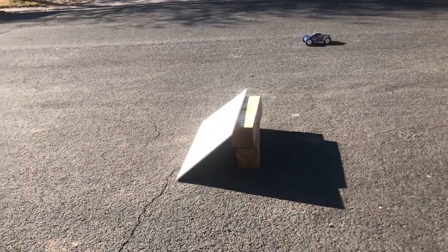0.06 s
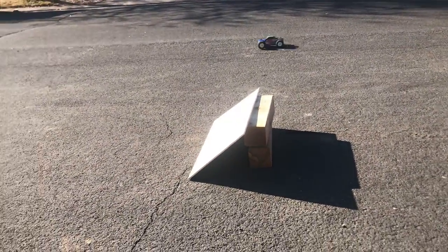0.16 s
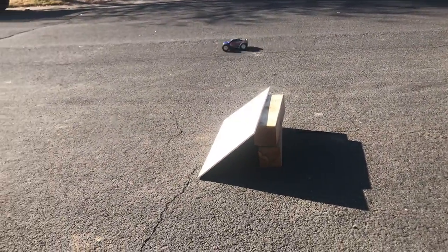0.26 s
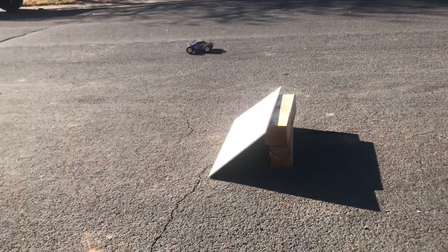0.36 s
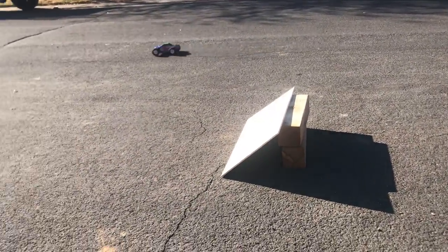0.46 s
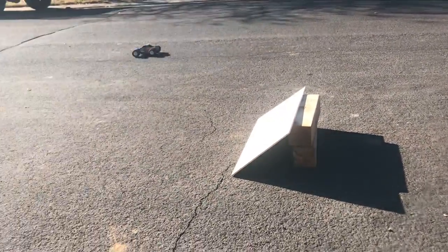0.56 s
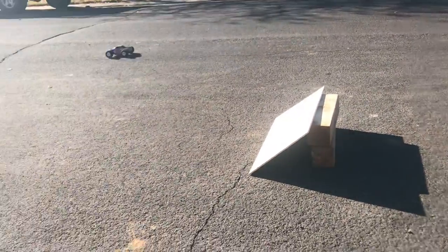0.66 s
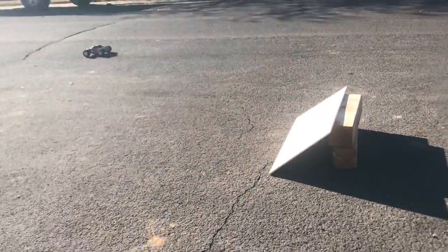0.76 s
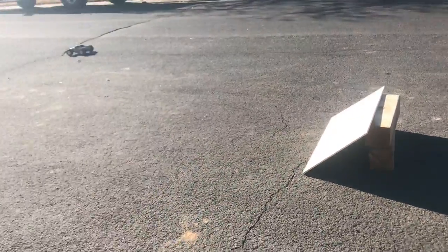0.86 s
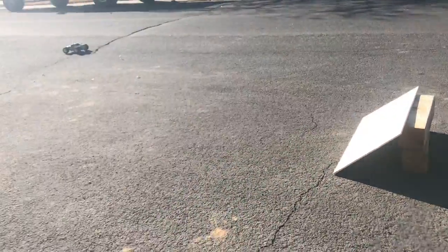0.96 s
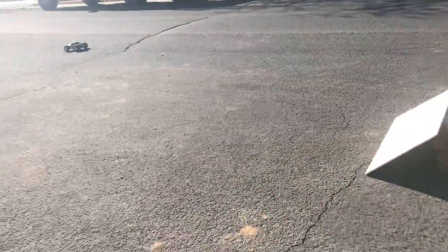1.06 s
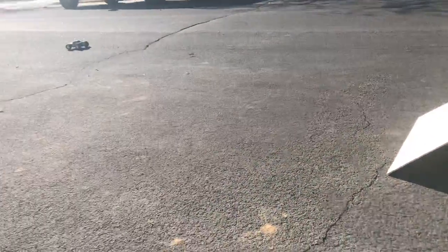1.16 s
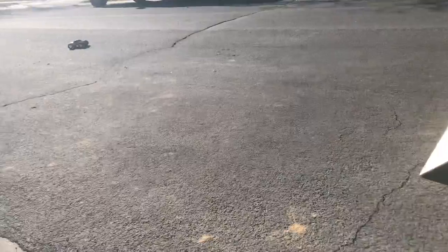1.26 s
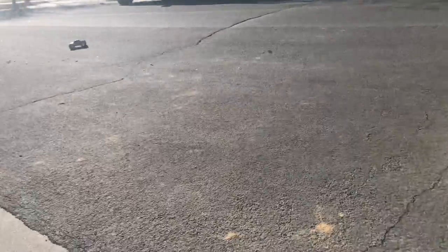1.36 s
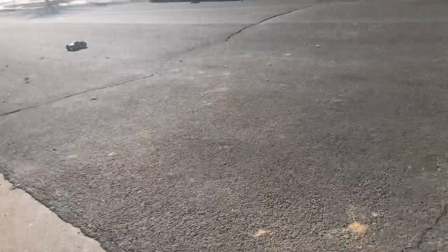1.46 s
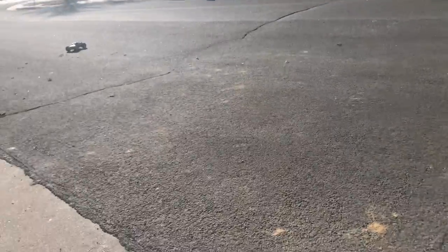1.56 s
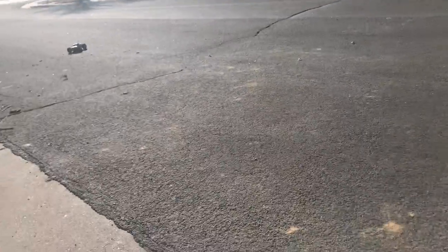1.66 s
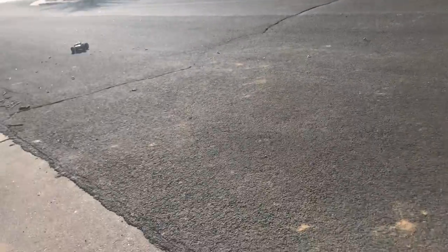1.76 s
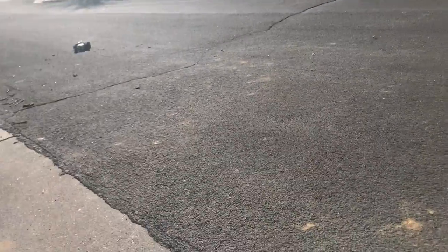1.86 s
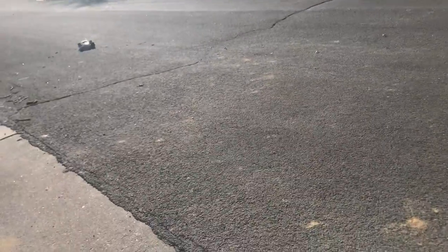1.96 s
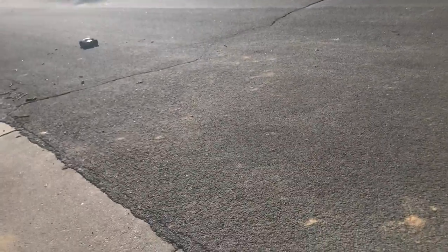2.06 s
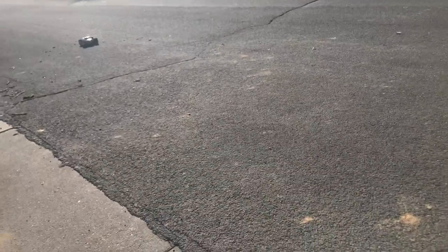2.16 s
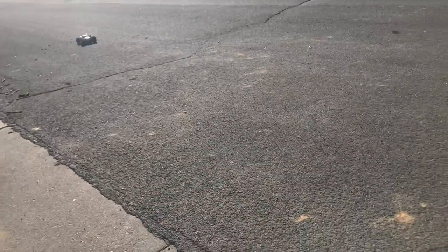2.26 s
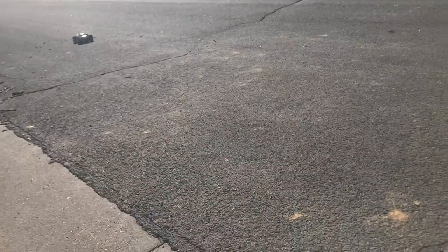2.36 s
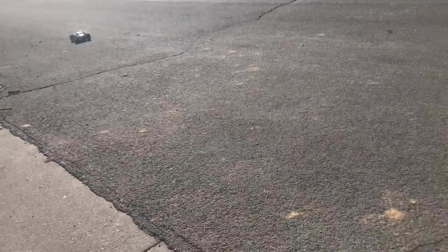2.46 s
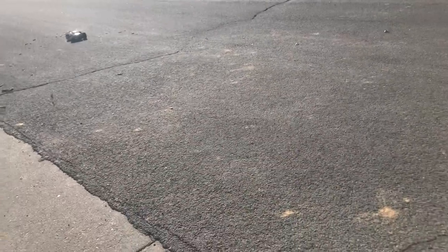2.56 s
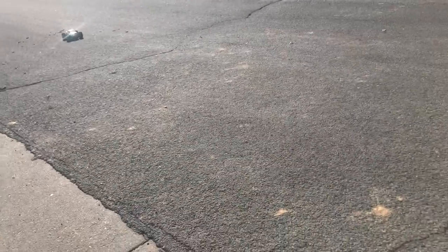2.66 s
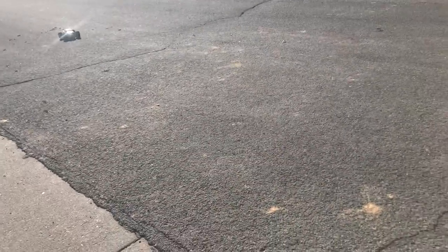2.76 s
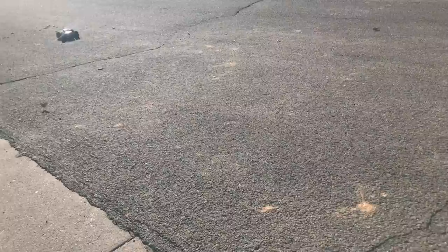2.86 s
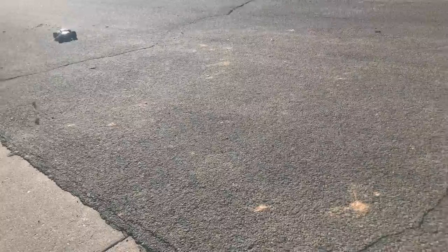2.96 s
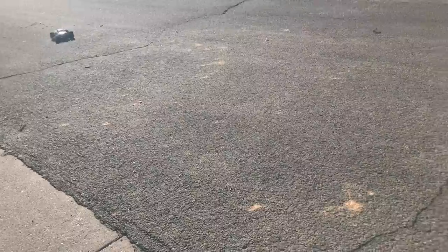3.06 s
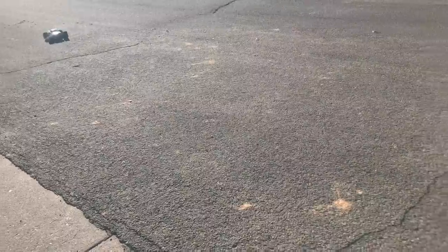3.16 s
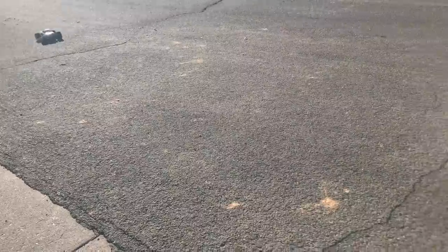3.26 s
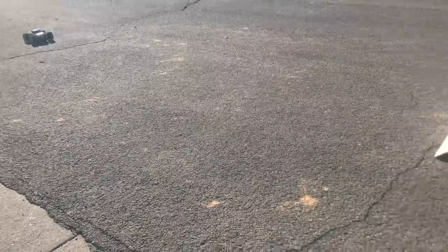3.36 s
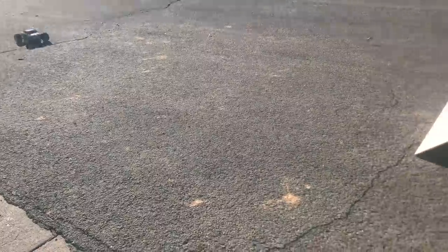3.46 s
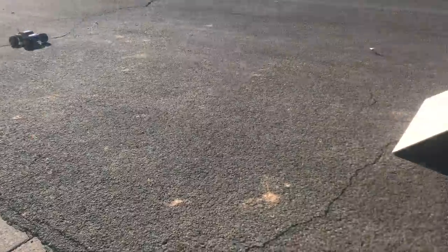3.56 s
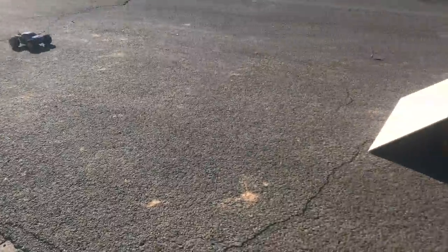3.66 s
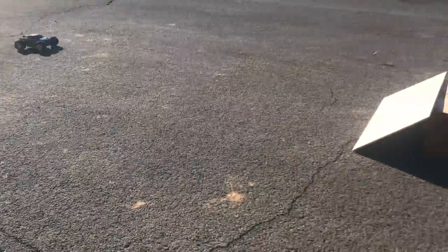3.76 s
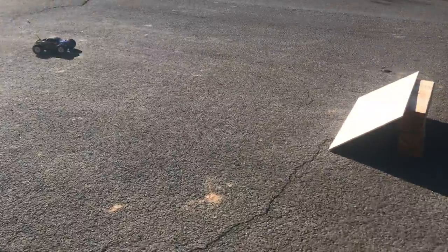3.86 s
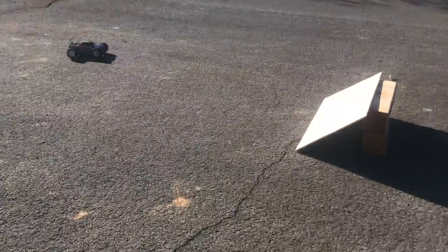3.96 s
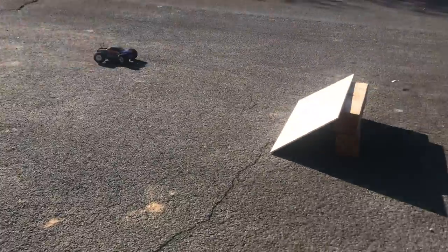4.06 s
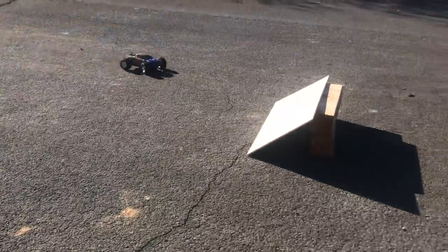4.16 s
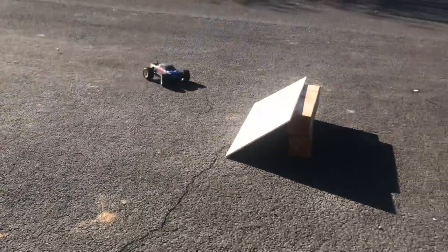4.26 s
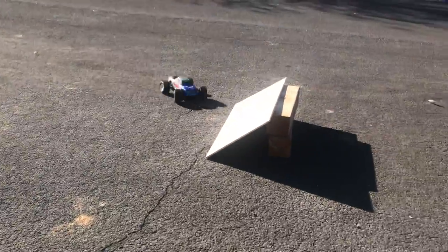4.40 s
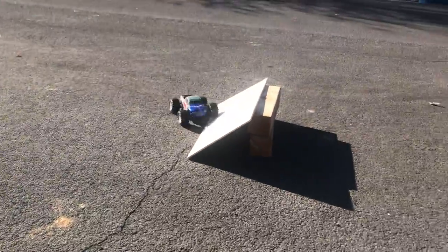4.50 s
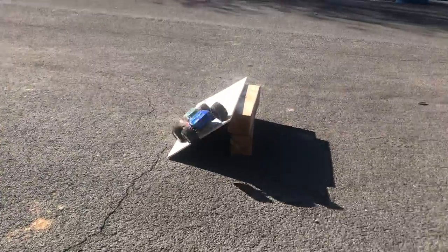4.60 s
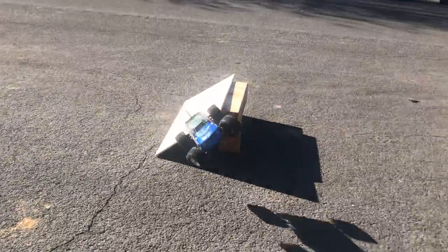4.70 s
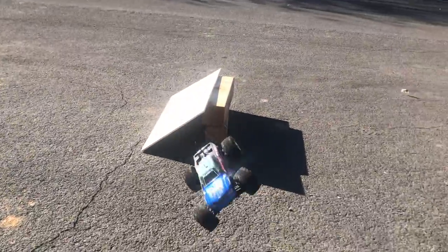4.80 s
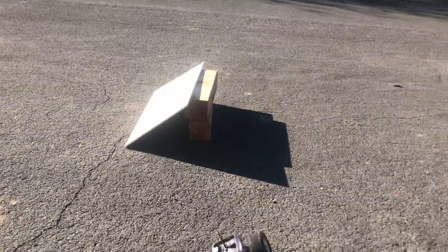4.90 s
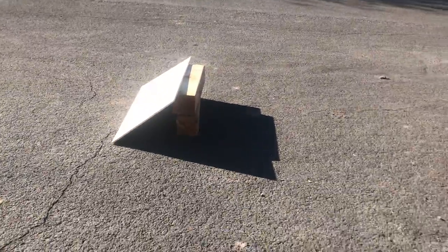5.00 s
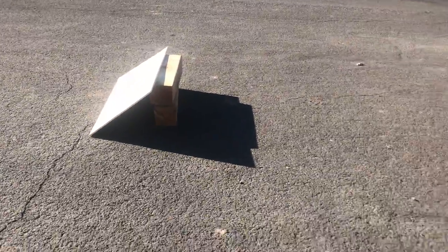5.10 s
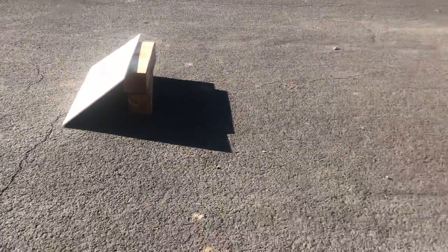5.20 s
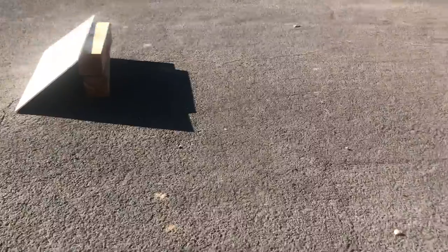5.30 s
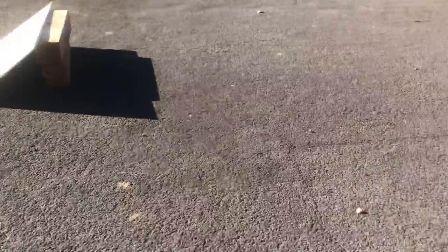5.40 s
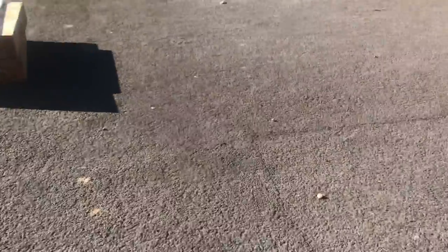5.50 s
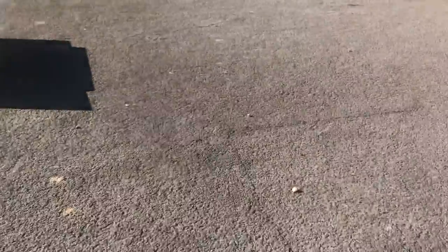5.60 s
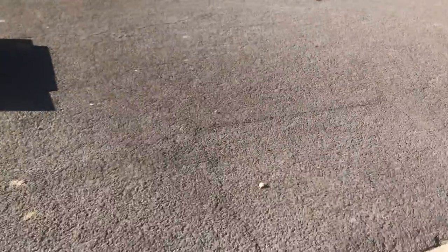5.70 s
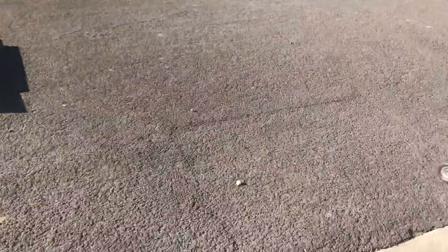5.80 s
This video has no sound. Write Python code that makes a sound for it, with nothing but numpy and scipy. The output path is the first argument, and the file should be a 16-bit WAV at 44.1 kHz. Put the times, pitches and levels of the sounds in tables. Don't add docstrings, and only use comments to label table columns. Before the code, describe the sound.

A toy truck's raspy gear whine rises and breaks into distant rattling bursts, with light tyre hum and a faint chirp. A tiny hard snap comes before a second, longer whine that sweeps up and gets louder and brighter, with wind buffeting the open-air microphone. A bright hard knock on a wooden ramp, loose gear clatter, a landing knock, diminishing rattles, two quick bird chirps, then a short rising whine.

```python
import sys
import numpy as np
from scipy import signal
from scipy.fft import rfft, irfft
from scipy.io import wavfile
from scipy.ndimage import uniform_filter1d

SR = 44100
rng = np.random.default_rng(int(sys.argv[2]) if len(sys.argv) > 2 else 0)


def inscribe(sig):
    pcm = np.round(np.clip(np.atleast_2d(sig).T, -1, 1) * 32767)
    wavfile.write(sys.argv[1], SR, pcm.astype(np.int16))


def volts_from_decibels(level):
    exponent = np.asarray(level, float) / 20
    return 10 ** exponent


N = 257544
T = np.arange(N) / SR

# start in seconds, tooth rate in Hz,
# level of the fundamental in dB, level of the upper partials in dB.
CRUISE = [(0, 2700, -7.5, 1.5), (.23, 2840, -8.5, -0.5), (.33, 2990, -10, -14.5), (.49, 3114, -15.5, -5),
          (.62, 3215, -38, -15), (.84, 3405, -25, -13.5)]
RESTART = [(2.5, 536, -27, -9), (2.6, 629, -37.5, -13), (2.67, 807.3, -23.5, -7.5),
           (2.71, 948.1, -9.5, -10), (2.752, 1094, -23, -7.5), (2.82, 1150, -25.5, -8.5),
           (2.845, 1267, -16, -6.5), (2.96, 1070, -24.5, -18), (3.01, 1246, -23, -10.5)]
RUN_UP = [(3.07, 1252, -21, -10.5), (3.145, 1270, -16.5, -4.5), (3.24, 1502, -2, -5),
          (3.361, 1735, -14, -6.5), (3.58, 2111, -13, -8.5), (3.8, 2326, -1.5, -4),
          (4.101, 2676, -13, -4.5), (4.29, 2689, -4, -9), (4.44, 2490, -7.5, -0.5)]
RAMP = [(4.44, 2480, -11.5, -8), (4.49, 2372, 2, 1), (4.55, 2601, -7.5, -6), (4.6, 2673, -9, -9.5),
        (4.618, 2217, -7.5, 1.5), (4.644, 2159, -31, -3), (4.66, 2516, -9, -19), (4.685, 2310, -7.5, -1.5),
        (4.72, 2160, -26.5, -21)]
SCUFF = [
    (4.915, 3350, -16, 1.5),
    (4.944, 3128, -15.5, -19),
    (4.961, 2779, -32.5, -17.5),
]
TOUCHDOWN = [
    (4.97, 3190, -13, -23.5),
    (4.99, 2904, -7.5, -9),
    (5.005, 2546, -23.5, -15),
    (5.025, 2109, -7, -11),
]
GETAWAY = [(5.639, 1050, -13, -4), (5.684, 1272, -9.5, -0.5), (5.73, 1363, 5.5, -2),
           (5.761, 1389, -1.5, -3), (5.799, 1438, 3, -4), (5.84, 1464, -1, -1.5)]

# time in seconds, lower side line in dB, upper side line in dB.
CHOPPER = [(0, -30, -37.5), (.27, -32.5, -1), (.36, 3.5, 4.5), (.55, 3, 9), (.7, -2, -6), (.9, -7, -15.5),
           (1.1, -29.5, -30)]
CHOPPER_HZ = 742.33

# one slowest moment in seconds, depth as a share of tooth rate, width in seconds.
SHUDDERS = [
    (3.24, 0.04517, 0.17005),
    (5.805, 0.06901, 0.11699),
]
SHUDDER_HZ = 20.347

# time in seconds, gear noise in dB.
GEAR_LOAD = [(0, -36.5), (.79, -30.5), (1.11, -43.5), (1.62, -46), (2.13, -50), (2.2, -55), (2.47, -51),
             (2.79, -35.5), (3.04, -42.5), (3.16, -34.5), (3.8, -30), (4.2, -34.5), (4.53, -28.5),
             (5.0, -35), (5.15, -35.5), (5.49, -45.5), (5.65, -35.5), (5.73, -26.5)]
# time in seconds, treble against gear noise in dB.
BRIGHTNESS = [(0, -7.5), (.8, -12.5), (1.15, -9), (1.6, -12.5), (2.2, -18.5), (3.0, -17.5), (3.8, -12.5),
              (4.2, -8), (5.0, -5.5), (5.5, -12), (5.8, -11)]
# centre in seconds, half length
# in seconds.
LULLS = [(2.933, 0.02471), (3.027, 0.0289), (5.056, 0.00753), (5.089, 0.00998), (5.228, 0.010785),
         (5.37, 0.00574)]
LULL_DB = -13.5

# time in seconds,
# level in dB, length in ms.
JOLTS = [(0.042, -29, 14.7), (0.072, -29.5, 6.946), (0.112, -28.5, 8.136), (0.153, -30.5, 9.31),
         (0.182, -29.5, 5.583), (0.22, -29, 9.004), (0.285, -28.5, 12.264), (0.342, -26, 8.58),
         (0.441, -26, 8.289), (0.535, -27, 9.613), (0.68, -26.5, 11.476), (0.721, -24, 8.734),
         (0.811, -24, 13.4), (2.521, -40.5, 5), (2.681, -31.5, 7.05), (2.769, -29, 5.25),
         (2.978, -26, 21.333), (3.08, -29, 34.01), (3.28, -28.5, 6.582), (3.309, -29.5, 10.35),
         (3.733, -28, 5.448), (3.958, -24.5, 10), (4.031, -25, 16.796), (4.091, -23, 10.124),
               (4.128, -22, 11.175), (4.157, -20.5, 8.559), (4.19, -22, 8.003), (4.207, -20.5, 8),
               (4.241, -22.5, 11), (4.27, -24.5, 16.895), (4.294, -24, 9.79), (4.325, -22, 4.6),
               (4.394, -26, 11.257), (4.418, -26, 11.974), (4.448, -26, 13.05), (4.601, -20, 5.308),
               (4.689, -25.5, 12.35), (5.696, -22.5, 9.55), (5.781, -20.5, 10.983)]
# time in seconds, level in dB, length in ms, ringing in Hz.
COASTING = [(0.861, -23.5, 5.92, 3435), (0.901, -27, 17.67, 3436), (0.949, -26, 8.17, 3508),
            (1.003, -26.5, 16.966, 3560), (1.052, -29.5, 12.38, 3572), (1.148, -28, 15.707, 3975),
            (1.225, -25.5, 7.112, 3191), (1.303, -24, 3.9, 5663), (1.36, -28.5, 9.98, 5255),
            (1.422, -29, 7.115, 6306), (1.439, -32.5, 9.545, 4224), (1.491, -29.5, 10.795, 3742),
            (1.601, -36.5, 10.105, 2886), (1.633, -40.5, 5.58, 2583), (1.685, -46.5, 6.83, 2604),
            (1.868, -42, 16.79, 2582), (1.989, -36.5, 28.88, 3880), (2.066, -35.5, 10.475, 3238),
            (2.13, -36.5, 13.71, 3211), (2.22, -43, 18.93, 5544), (2.272, -42.5, 13.26, 6189),
            (2.389, -41.5, 27.01, 3360)]
BOUNCES = [(4.744, -18.5, 18.06, 2640), (4.805, -19, 13.16, 5929), (4.868, -14, 9.32, 3314),
           (4.943, -17, 21.713, 3346), (4.996, -18.5, 21.21, 2841), (5.033, -22.5, 9.83, 5195),
           (5.07, -24, 9.906, 5239), (5.113, -26.5, 11.77, 3066), (5.152, -31, 36.35, 2978),
           (5.255, -28, 10.305, 3880), (5.303, -23.5, 16.007, 3959), (5.337, -27.5, 10.85, 5024),
           (5.427, -22.5, 17.51, 6605), (5.509, -33, 8.065, 6161), (5.564, -18.5, 9.823, 6407),
           (5.629, -23.5, 6.09, 6174)]
JOLT_TREBLE_DB, BURST_TREBLE_DB = -1.5, -3

# frequency in Hz, level in dB.
CASING = [(1700, -10), (2100, -5), (2600, -4), (3300, 2), (3700, -1.5), (4300, -0.5), (4800, -5.5),
          (5350, 2), (6200, -1.5), (6900, -5), (7500, -8.5), (8000, -46.5), (8200, -32.5)]
# frequency in Hz, level in dB.
TREBLE = [(6500, -4.5), (7100, -3.5), (7900, -4), (8700, -1.5), (9500, -5.5), (10400, -8), (11500, -6),
          (13500, -9.5), (15800, -15)]

# time in seconds, shell hum in dB.
TYRE_HUM = [(0, -36.5), (.68, -34.5), (1.11, -44), (1.59, -39), (1.7, -54), (2.45, -59.5), (2.65, -54),
            (3.05, -56.5), (3.23, -49), (3.45, -45.5), (3.86, -36.5), (4.42, -38), (4.51, -35.5),
            (4.69, -44), (4.75, -32.5), (5.04, -30), (5.25, -35), (5.6, -41.5)]
# start in seconds, end in seconds, change of rumble in dB.
CONTACT = [
    (4.488, 4.678, 11.5),
    (4.724, 4.93, -25.5),
    (4.94, 5.149, 10),
]

# time in seconds, crack peak in dB, thud in dB.
KNOCKS = [
    (4.502, 8, -11),
    (4.5045, 3.5, -26),
    (4.548, -11.5, -17.5),
    (4.622, -24, -18),
    (4.947, -5.5, -19.5),
    (4.993, -21.5, -13.5),
    (5.118, -37, -18),
]
# frequency in Hz, level in dB, time to fade 60 dB in seconds (held to 0.1 at
BOARD_MODES = [(1016.3, -3.5, 0.16), (1142.2, -7, 0.1088), (1399, 2.5, 0.32), (1804.8, -5, 0.0672),
               (1907.5, -4, 0.05765), (2309.5, -7, 0.08)]
# time in seconds, peak in dB, centre frequency in Hz.
GRIT = [(1.607, -31, 7040), (1.6236, -31.5, 7013), (1.823, -31.5, 7033), (1.8663, -34, 9590),
        (1.965, -32.5, 8834), (1.9914, -40, 7040), (2.0423, -36, 7060), (2.1532, -29, 7320),
        (2.157, -29, 7016), (2.184, -34, 9290), (2.2702, -49, 7000), (2.3833, -25, 9560),
        (2.4693, -37.5, 8960), (2.6301, -24.5, 12710)]

# time in seconds, length in seconds, start in Hz, middle in Hz, end in Hz, level in dB.
CHIRPS = [
    (1.74, 0.06167, 6840, 7542, 9855, -48.5),
    (5.387, 0.04, 5100, 6440, 5392, -32),
    (5.439, 0.02064, 5111, 6150, 5442, -31.5),
]

# peak time in seconds, level in dB, time to fade 20 dB in seconds, flutter in dB.
GUSTS = [(.61, -61.5, 0.2686, -10), (1.0, -51.5, 0.3685, -5), (4.04, -31.5, 0.0531, -7.5),
         (1.79, -40, 0.129, -35.5), (2.89, -34, 0.0009, -14.5), (2.72, -45.5, 0.3335, -32.5),
         (2.96, -25, 0.07, -39), (3.27, -33.5, 0.0605, -27), (3.55, -47, 0.4884, -22),
         (3.86, -39, 0.2069, -16.5), (4.159, -20.5, 0.0823, -4.5), (4.39, -27.5, 0.1304, -13),
         (4.62, -23.5, 0.209, -9.5), (4.98, -27, 0.1159, -6), (5.12, -35.5, 0.0967, -4),
         (5.26, -31.5, 0.2485, -10.5), (5.68, -38.5, 0.1752, -15)]

# frequency in Hz, level in dB.
STREET = [(59, -42), (100, 5), (177, -18.5), (315, -18.5), (1550, -5), (1870, -15.5), (3250, 1.5),
          (4470, -8.5), (6990, -56), (16000, -63.5)]
STREET_DB = -53


def gearbox():
    (load_db,), (bright_db,) = curves(GEAR_LOAD), curves(BRIGHTNESS)
    lull = sum(np.exp(-((T - s) / half) ** 4) for s, half in LULLS)
    mid_power = volts_from_decibels(load_db + LULL_DB * lull) ** 2
    top_power = mid_power.copy()
    ring, slip = np.zeros(N), shudder()
    for s, db, ms in JOLTS:
        t, swell = take_up(ms)
        add(mid_power, s + t[0], swell * volts_from_decibels(db - 6.0) ** 2)
        add(top_power, s + t[0], swell * volts_from_decibels(db + JOLT_TREBLE_DB) ** 2)
        add(slip, s + t[0], -10.0 * t * np.sqrt(swell) * (ms < 16))
    for s, db, ms, hz in COASTING + BOUNCES:
        t, swell = take_up(ms)
        add(mid_power, s + t[0], swell * volts_from_decibels(db - 0.0284) ** 2)
        add(top_power, s + t[0], swell * volts_from_decibels(db + BURST_TREBLE_DB) ** 2)
        turn = 2 * np.pi * hz * (t - 0.5656 * t ** 2)
        mate = 1.8 if hz < 4500 else .55
        tones = np.sin(turn) + 0.3348 * np.sin(mate * turn)
        add(ring, s + t[0], np.sqrt(swell) * volts_from_decibels(db - 6.5) * tones)
    rough = volts_from_decibels(2.7824 * walk(179.66))
    rattle = volts_from_decibels(-6.5) * coloured(CASING) * rough
    treble = volts_from_decibels(bright_db) * np.sqrt(top_power) * coloured(TREBLE) * rough
    bite = (mid_power / uniform_filter1d(mid_power, 2500)) ** .4
    meshing = np.sqrt(mid_power) * (rattle / np.sqrt(bite) + bite * whine(slip))
    return meshing + treble + ring * (.8 + .55 * walk(300))


def whine(slip):
    out = np.zeros(N)
    slow, quick = walk(35), walk(500)
    lower_db, upper_db = curves(CHOPPER)
    drift = [volts_from_decibels(2 * walk(90 + 30 * k) + (1.5 + .25 * k) * walk(14)) for k in range(8)]
    grain = [walk(600 + 150 * k) for k in range(8)]
    chop = 2 * np.pi * CHOPPER_HZ * T
    for rows in (CRUISE, RESTART, RUN_UP, RAMP, SCUFF, TOUCHDOWN, GETAWAY):
        hz, first_db, high_db = curves(rows)
        rough = np.clip((hz - 1900) / 700, .2, 1.5)
        waver = 1 + slip + .006 * rough * slow + .011 * quick
        turn = 2 * np.pi * np.cumsum(hz * waver) / SR
        stack = volts_from_decibels(first_db + 2) * drift[1] * (1 + .35 * rough * grain[1]) * np.sin(turn)
        slope_db = np.clip(hz / 500 - 1.6, .6, 3.2)
        for k in range(2, 8):
            partial_db = high_db + 1.5 - slope_db * (k - 1.5) + 0.9806 * casing_db(k * hz)
            size = volts_from_decibels(partial_db) * (k * hz < 14000)
            stack += size * drift[k] * (1 + .6 * rough * grain[k]) * np.sin(k * turn)
        side_lines = volts_from_decibels(lower_db - 17) * np.sin(turn - chop) + volts_from_decibels(upper_db - 12.0) * np.sin(turn + chop)
        stack += drift[0] * (1 + .5 * grain[0]) * side_lines
        out += stack * ((T >= rows[0][0]) & (T < rows[-1][0]))
    return np.sqrt(2) * out


def casing_db(hz):
    f, db = np.transpose(CASING[:-2] + [(f, db - 5.0) for f, db in TREBLE[2:]])
    return np.interp(np.log(hz), np.log(f), db)


def take_up(ms):
    ms = max(ms, 5)
    u = np.arange(-1.5, 2.5, 1000 / SR / ms)
    return u * ms / 1000, np.exp(-np.abs(u / np.where(u < 0, .62, .66)) ** 3)


def shudder():
    swing = np.zeros(N)
    for s, depth, width in SHUDDERS:
        swing -= depth * np.cos(2 * np.pi * SHUDDER_HZ * (T - s)) * np.exp(-((T - s) / width) ** 2)
    return swing


def mirrored(x):
    share = .36 * np.clip(2.4 - T, 0, 1)
    delay = 14
    return (x + share * np.roll(x, delay)) / np.sqrt(1 + share ** 2)


def tyres():
    hum_db, = curves(TYRE_HUM)
    steps_db = sum(db * ((T > a) & (T < b)) for a, b, db in CONTACT)
    contact_db = uniform_filter1d(steps_db, size=900)
    rumble_db = -49 + 0.3913 * (hum_db + 40.5) + contact_db
    hum = unit(band(band(rng.standard_normal(N), 1345.9, 1501.2, order=1), 862.5, 4885, order=1))
    rumble = unit(band(rng.standard_normal(N), 522.25, 654.52, order=1))
    rumble += 1.178 * unit(band(rng.standard_normal(N), 806.1, 1120.5, order=1))
    hum_gain = volts_from_decibels(hum_db - 1.86 + 2.8113 * walk(58.42))
    rumble_gain = volts_from_decibels(rumble_db - 5.5 + 0.6346 * walk(37.85))
    return hum_gain * hum + rumble_gain * rumble


def knocks():
    out, t = np.zeros(N), T[:4000]
    board = np.zeros(len(t))
    for hz, db, t60 in BOARD_MODES:
        board += volts_from_decibels(db) * np.sin(2 * np.pi * hz * t) * volts_from_decibels(-60 * t / min(t60, .1))
    crack = np.sin(2 * np.pi * 3100 * t) * (t / 0.0005567) * np.exp(1 - t / 0.00022347)
    for s, db, thud_db in KNOCKS:
        tail = unit(band(rng.standard_normal(len(t)), 793.2, 3037)) * np.exp(-t / 0.01727)
        add(out, s - .0006, volts_from_decibels(db) * crack + volts_from_decibels(thud_db) * (0.3393 * board + 0.3928 * tail))
    return out


def grit():
    out, t = np.zeros(N), T[:900]
    decay = np.exp(-t / 0.0005916) + 0.3906 * np.exp(-t / 0.005007)
    for s, db, hz in GRIT:
        tick = band(rng.standard_normal(len(t)) * decay, hz * 0.5987, hz * 1.5033)
        add(out, s, volts_from_decibels(db) * tick / np.abs(tick).max())
    return out


def stone_snap():
    out, t = np.zeros(N), T[:300]
    ring = 0.329 * band(rng.standard_normal(len(t)), 2777, 12500, order=1) * np.exp(-t / 0.000844)
    cycle = np.sin(2 * np.pi * 6500 * t) * (t / 0.00012115) * np.exp(1 - t / 0.000071)
    add(out, 2.6085, volts_from_decibels(-9) * (ring - cycle))
    return out


def bird():
    out = np.zeros(N)
    for s, length, *hz, db in CHIRPS:
        u = np.arange(0, 1, 1 / (length * SR))
        turn = 2 * np.pi * np.cumsum(np.interp(u, [0, .6, 1], hz)) / SR
        add(out, s, volts_from_decibels(db) * np.sin(np.pi * u) ** .5 * np.sin(turn))
    return out * volts_from_decibels(3 * walk(150))


def wind():
    low_gain, flutter_gain = volts_from_decibels(-56.5), volts_from_decibels(-54.5)
    for s, db, fade, flutter_db in GUSTS:
        gust = volts_from_decibels(db - 20 * np.abs(T - s) / np.where(T < s, 0.9444 * fade, fade))
        low_gain = low_gain + gust
        flutter_gain = flutter_gain + volts_from_decibels(flutter_db) * gust
    low = unit(band(rng.standard_normal(N), 40.539, 86.5)) * volts_from_decibels(3.282 * walk(17.263))
    flutter = unit(band(rng.standard_normal(N), 71.53, 212.79)) * volts_from_decibels(2.823 * walk(29.06))
    return low_gain * low + flutter_gain * flutter


def street():
    return volts_from_decibels(STREET_DB - 8.5) * coloured(STREET)


def unit(x):
    return x / np.sqrt(np.mean(x ** 2))


def curves(table):
    s, *columns = np.transpose(table)
    return [np.interp(T, s, c) for c in columns]


def coloured(points):
    below, above = (points[0][0] * .7, -70), (points[-1][0] * 1.3, -70)
    hz, db = np.transpose([below] + list(points) + [above])
    f = np.arange(N // 2 + 1) * SR / N + 1
    gain = volts_from_decibels(np.interp(np.log(f), np.log(hz), db))
    return unit(irfft(rfft(rng.standard_normal(N)) * gain, N))


def band(x, lo_hz, hi_hz, order=2):
    edges = [lo_hz, min(hi_hz, .45 * SR)]
    return signal.sosfilt(signal.butter(order, edges, "bandpass", fs=SR, output="sos"), x)


def walk(rate):
    size = int(SR / rate)
    return unit(uniform_filter1d(uniform_filter1d(rng.standard_normal(N), size), size))


def add(out, s, piece):
    i = max(int(s * SR), 0)
    out[i:i + len(piece)] += piece[:N - i]


def scene():
    truck = mirrored(gearbox()) + tyres() + knocks() + grit() + stone_snap()
    echoes = rng.standard_normal(6000) * np.exp(-T[:6000] / .03)
    wet = volts_from_decibels(-19) * signal.fftconvolve(truck, echoes / np.linalg.norm(echoes))[:N]
    return (truck + wet + bird() + wind() + street())[None]


def low_pass(x):
    return signal.sosfilt(signal.butter(12, 16480, fs=SR, output="sos"), x)


def record(dry):
    mix = signal.sosfilt(signal.butter(2, 35, "highpass", fs=SR, output="sos"), dry)
    mix = signal.sosfilt(signal.ellip(8, .3, 50, 15900, fs=SR, output="sos"), mix)
    return low_pass(mix)


dry = scene()
out = record(dry)
inscribe(out)
```